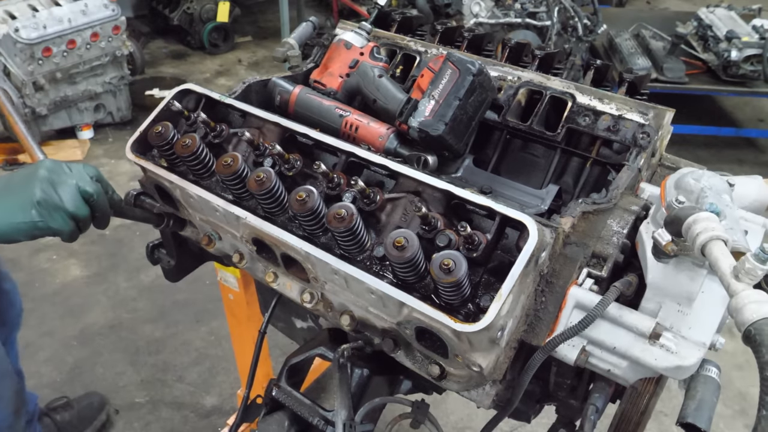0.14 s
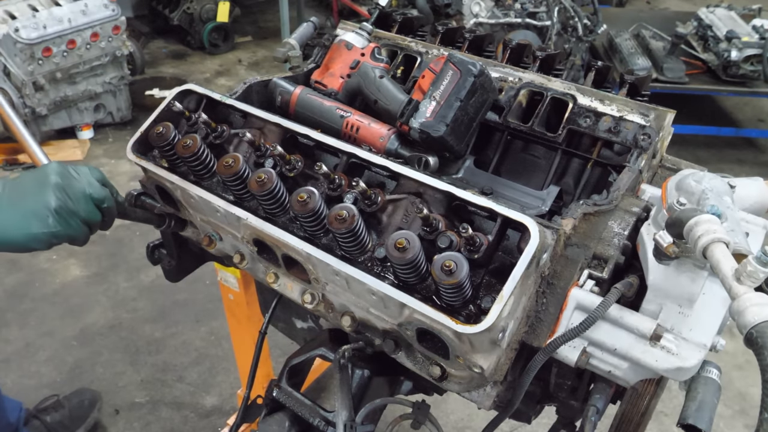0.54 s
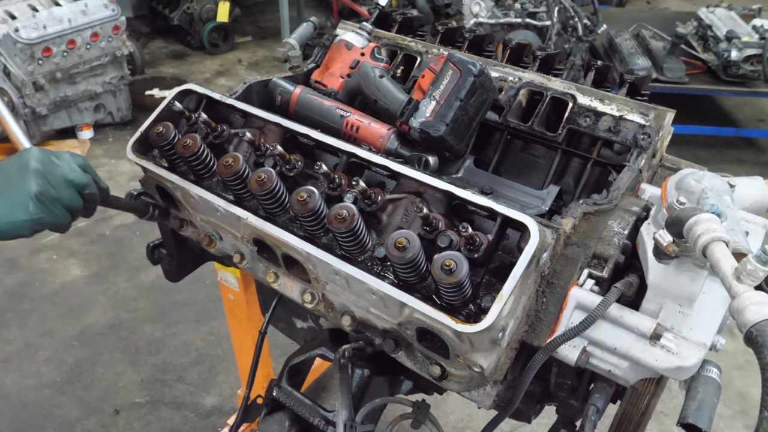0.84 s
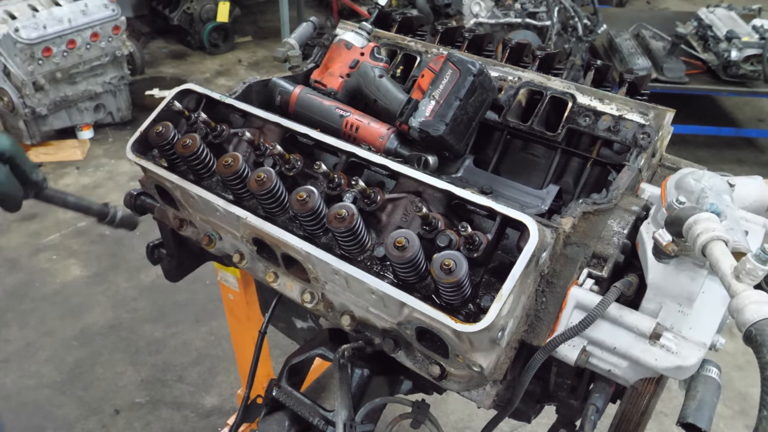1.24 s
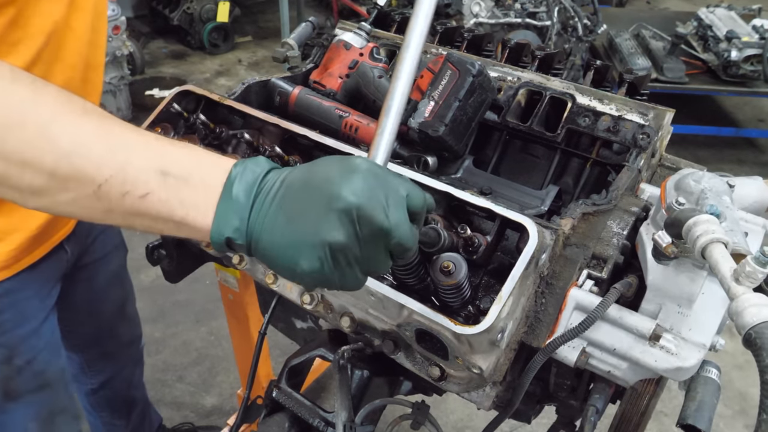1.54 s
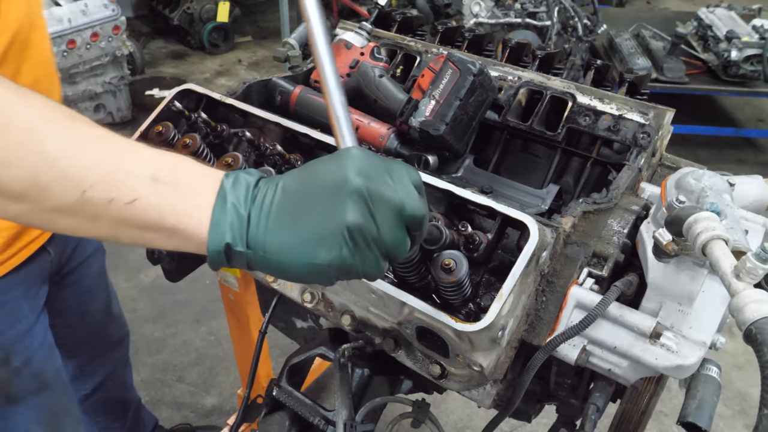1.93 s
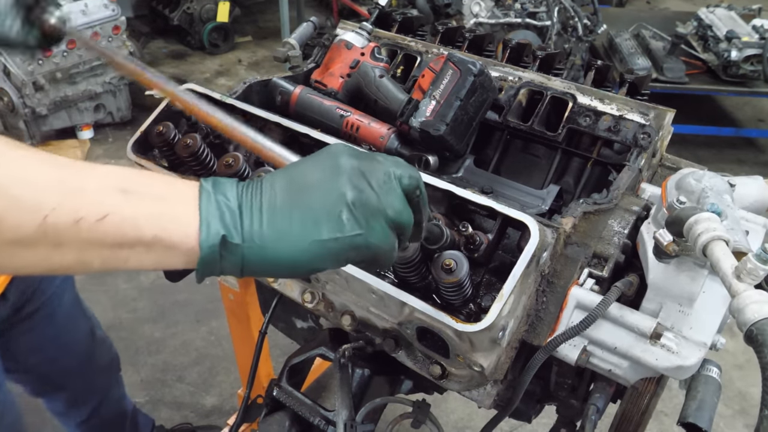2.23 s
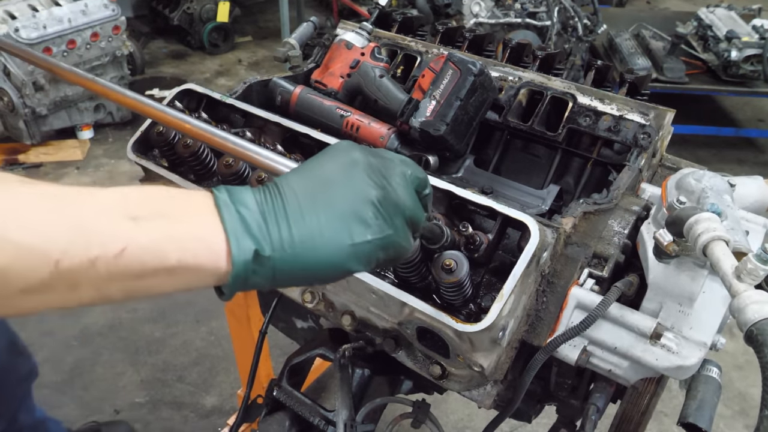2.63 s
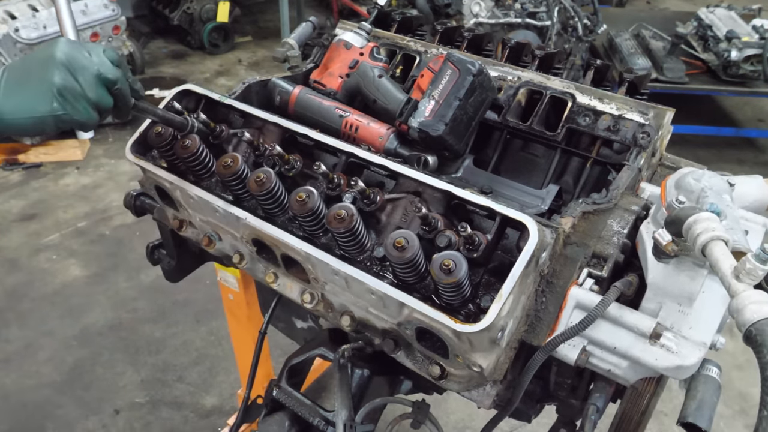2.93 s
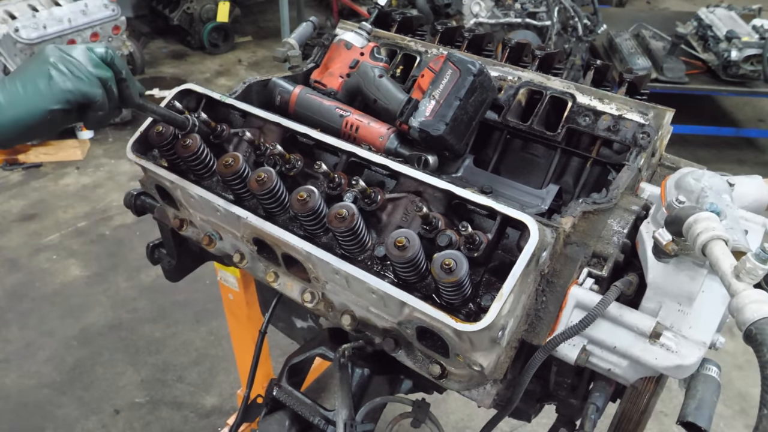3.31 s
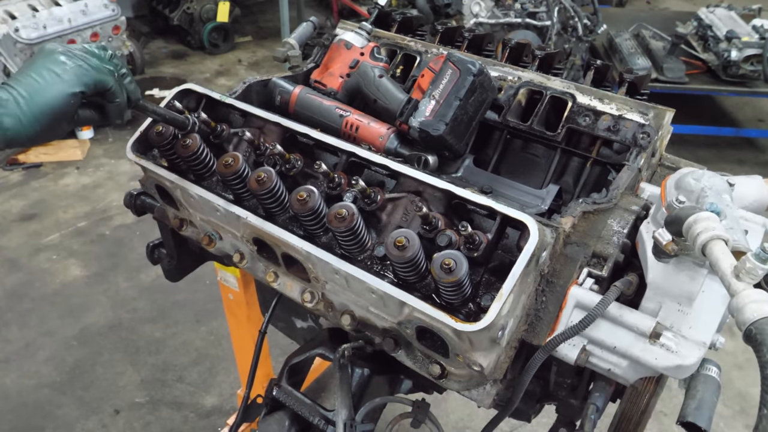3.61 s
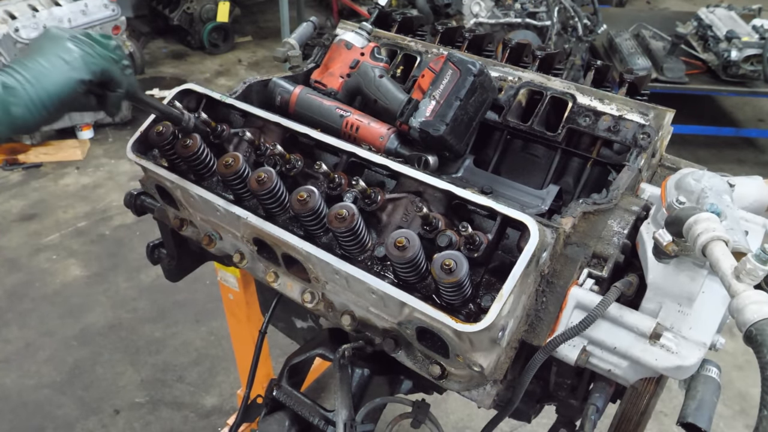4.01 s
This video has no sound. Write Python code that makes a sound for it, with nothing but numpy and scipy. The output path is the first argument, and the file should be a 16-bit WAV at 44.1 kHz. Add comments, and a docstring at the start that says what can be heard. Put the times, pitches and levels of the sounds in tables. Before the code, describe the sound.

A long steel breaker bar cracks two engine bolts loose with sharp double metallic snaps that ring briefly through a workshop, then a light socket click.

```python
"""In a workshop, a long steel breaker bar cracks two engine bolts loose, each with a double slip.
The bar rings as decaying sine modes under a snap of shaped noise; the engine stand thumps as a low
sine that glides down, and the hall rings on as filtered noise echoes. Between them the socket clicks
in modes of its own, small parts tick as noise bursts through a resonance, and gloves rustle and
scuff as coloured noise, over a low room rumble, mains hum and a faint stereo hiss."""
import sys
import numpy as np
from scipy import signal
from scipy.fft import rfft, irfft
from scipy.io import wavfile
from scipy.ndimage import uniform_filter1d

SR = 44100
rng = np.random.default_rng(int(sys.argv[2]) if len(sys.argv) > 2 else 0)


def digitize_waveform(pressure):
    """Quantize a signal to 16-bit integers and store it at the path in sys.argv[1].

    Rows of a 2-D input are taken as channels; values are limited to [-1, 1].
    """
    field = np.atleast_2d(pressure).T
    bounded = np.clip(field, -1, 1)
    quanta = np.round(bounded * 32767).astype(np.int16)
    wavfile.write(sys.argv[1], SR, quanta)


N = 183487


def amp(db):
    """Decibels to gain."""
    return 10 ** (np.asarray(db) / 20)


def evened(x):
    """Scales to rms 1."""
    return x / np.sqrt(np.mean(x ** 2) + 1e-20)


def read(points, hz):
    """Reads a spectrum table on a log frequency axis."""
    f, value = np.transpose(points)
    return np.interp(np.log(hz + 1), np.log(f + 1), value)


def curve(rows):
    """Draws a table of breakpoints as a straight-line curve at every sample."""
    return np.interp(np.arange(N) / SR, *np.transpose(rows))


def coloured(x, points):
    """Filters by a table of level over frequency, without shifting phase."""
    gain = amp(read(points, np.fft.rfftfreq(len(x), 1 / SR)))
    return irfft(rfft(x) * gain, len(x))


def add(mix, s, direct, sent, hall_db):
    """Adds a sound to the direct row and what it sends to the hall row."""
    part = mix[:, round(s * SR):][:, :len(direct)]
    part += np.array([direct, sent * amp(hall_db)])[:, :part.shape[1]]


def slip(grip, ring_db):
    """A bolt lets go: snap, thump and hall share follow the strength of the bar's ring."""
    # bending modes of the bar: [f/Hz]
    bar_hz = [721, 1215, 1864, 2585, 3172, 3335, 3540, 4118, 4265, 6620, 7850, 2536, 2880, 5700]
    # the same modes: [level at grip 0/dB, level at grip 1/dB, t60/s, rise/s, share sent to the hall/dB]
    bar_modes = [(-4, -17.5, 0.14, 0.013, -13), (-16, -10.5, 0.06, 0.0024, 2),
                 (-10.5, -7.5, 0.06, 0.00096, 4), (6, 4.5, 0.045, 0.0021, -1),
                 (-20.5, -2.5, 0.025, 0.0027, 7.8), (-4.5, -6.5, 0.039, 0.00067, 6.5),
                 (-18, -17.5, 0.11, 0.00076, -6), (-3.5, -19.5, 0.067, 0.00076, -1),
                 (-12, -20.5, 0.041, 0.0012, 4.5), (-14.5, -18.5, 0.0099, .001, -5.5),
                 (-18.5, 5, .008, 0.00082, -6.5), (1, -2, 0.054, 0.0045, -3), (-22.5, -7, 0.031, .0012, -1),
                 (-27, -13.5, .03, .0012, 3.5)]
    snap_db = 0.5 + 1.598 * ring_db  # the snap grows faster than the ring
    snap_t60_s = 0.046 + .0022 * ring_db  # and lasts longer when the ring is stronger
    thump_db = -7 + 1.45 * ring_db
    hall_db = -14.5 + .45 * ring_db + 5.5 * grip
    tilt_db = -0.82  # per octave
    direct, sent = blow(bar_hz, bar_modes, grip, ring_db, snap_db, snap_t60_s, tilt_db, thump_db)
    return direct, sent, hall_db


def click(*levels):
    """The socket seats or lifts: the same kind of blow on the modes of socket and extension."""
    # modes of socket and extension: [f/Hz]
    socket_hz = [601, 680, 2700, 3650, 4235, 4275, 4600, 7200]
    # the same modes: [level at grip 0/dB, level at grip 1/dB, t60/s, rise/s, share sent to the hall/dB]
    socket_modes = [(-29, -1.5, 0.49, .04, -9.5), (-17, -20, 0.22, 0.005, -1), (-26, 3, 0.018, .001, 1.5),
                    (-26.5, -1.5, 0.052, .004, -1.1), (-35, -14, 0.329, 0.0045, -0.5),
                    (-18, 6.5, 0.057, 0.00063, 1), (3, -5, 0.025, 0.001, 3.6),
                    (-38, 14, 0.021, 0.0014, -11)]
    return blow(socket_hz, socket_modes, *levels)


def blow(modes_hz, modes, grip, ring_db, snap_db, snap_t60, tilt_db, thump_db):
    """Modes swell and die, with a gritty snap and a low push; gives direct sound and hall send."""
    t = np.arange(SR // 2) / SR
    tilt = [(250, -3 * tilt_db), (16000, 3 * tilt_db)]  # six octaves about 2 kHz
    rings = ring(t, modes_hz, modes, grip, ring_db)
    direct = rings.sum(axis=0) + amp(snap_db) * snap(t, snap_t60, tilt) + amp(thump_db) * thump(t)
    sent_db = np.transpose(modes)[4][:, None]
    sent = (rings * amp(sent_db)).sum(axis=0) + wash_pulse(len(t), snap_db, tilt)
    return direct, sent


def ring(t, modes_hz, modes, grip, ring_db):
    """Each mode is a sine that swells, then dies; the grip sets the balance of the modes."""
    hz = np.array(modes_hz)[:, None]
    near_db, far_db, t60, rise, _ = np.transpose(modes)[:, :, None]
    # where the hand holds decides which modes sound
    db = near_db + np.clip(grip, 0, 1) * (far_db - near_db)
    swell = amp(db - 60 * t / t60) * (1 - np.exp(-t / rise)) ** 2
    start_cycles = 0.29 * rng.random(hz.shape)
    return amp(ring_db) * swell * np.sin(2 * np.pi * (hz * t + start_cycles))


def snap(t, t60, tilt):
    """Gritty noise with a near-instant attack, a main decay and a softer fixed one."""
    # colour of the snap before the tilt: [f/Hz, level/dB]
    snap_colour = [(150, -40.5), (300, -9), (1000, -15), (2200, -19.5), (3500, -13), (8000, -14),
                   (12000, -18), (16000, -32)]
    grit = evened(coloured(coloured(rng.standard_normal(len(t)), snap_colour), tilt))
    attack = 1 - np.exp(-t / 0.00016)
    return grit * attack * (amp(-60 * t / t60) + amp(-15.0 - 60 * t / 0.089))


def thump(t):
    """Push through the stand: a sine that glides down to 21 Hz as it dies."""
    late = np.maximum(t - .002, 0)  # follows the snap by 2 ms
    glide_cycles = 0.88 * (1 - np.exp(-late / 0.0068))
    return np.sin(2 * np.pi * (21 * late + glide_cycles)) * amp(-60 * late / .085)


def wash_pulse(length, snap_db, tilt):
    """The snap as it excites the hall: over all directions it is smooth, so one coloured pulse."""
    # bright snap as the walls return it: [f/Hz, level per Hz/dB]
    wash = [(1650, -37), (2800, -12), (3410, -3), (5020, -13), (5640, -10), (6110, -11), (7330, -7.5),
            (8550, -11.5), (9460, -11), (11700, -17), (12200, -23.5), (16000, -35.5)]
    # its lower end, in place of the first row above: [f/Hz, level per Hz/dB]
    wash_low = [(100, -48.5), (250, -27.5), (1000, -16), (2200, -15)]
    pulse = coloured(signal.unit_impulse(length, 300), wash_low + wash[1:])
    return coloured(pulse / np.linalg.norm(pulse), tilt) * amp(snap_db + 24.5)


def tick(db, hz, width_hz, t60):
    """Small part or tool: a burst of noise through one broad resonance."""
    t = np.arange(SR // 5) / SR
    f = np.fft.rfftfreq(len(t), 1 / SR)
    resonance = 1 / (1 + (2 * (f - hz) / width_hz) ** 2)
    band = irfft(rfft(rng.standard_normal(len(t))) * resonance, len(t))
    swell = 1 - np.exp(-t * width_hz / .6)  # a narrow resonance takes longer to swell
    return evened(band) * amp(db - 60 * t / t60) * swell


def hall(x):
    """Dense echoes: near benches fade fast, then each band dies at its own speed."""
    # slow decay of the hall: [f/Hz, t60/s]
    band_t60 = [(100, 1), (260, 3.6), (700, 0.94), (1840, 1.248), (4850, 1.008), (12800, 0.59)]
    hz, t, z = signal.stft(rng.standard_normal(2 * SR), SR, nperseg=256)
    walls = amp(-60 * t / read(band_t60, hz)[:, None])
    benches = amp(1.0 - 60 * t / 0.23)
    tail = signal.istft(z * (walls + benches), SR, nperseg=256)[1]
    # silent for 8 ms, then the echoes fade in
    tail = tail * np.clip((np.arange(len(tail)) / SR - .008) / 0.0071, 0, 1)
    return signal.fftconvolve(x, tail / np.linalg.norm(tail))[:N]


def strokes(rows, fall_s, rest_db):
    """Gain that rises, holds and falls for every stroke, over a steady rest."""
    t = np.arange(N) / SR
    gain = amp(rest_db)
    for s, rise, hold, db in rows:
        corners = np.cumsum([0, rise, hold, fall_s])
        gain = gain + amp(db) * np.interp(t - s, corners, [0, 1, 1, 0])
    return gain


def glove_rustle():
    """Gloves and sleeves: bright noise that swells with each gesture."""
    # colour of the cloth: [f/Hz, level/dB]
    rustle_colour = [(1500, -25), (4000, -5.5), (8000, 2.5), (12000, 1.5), (14500, -1), (15800, -27.5)]
    # gestures: [start t/s, rise/s, hold/s, level/dB]
    gestures = [(0, 0.0033, 0.098, -70.5), (.45, 0.041, 0.25, -81), (1.21, .03, 0.1, -74.5),
                (1.7, 0.41, .3, -63.5)]
    noise = evened(coloured(rng.standard_normal(N), rustle_colour))
    return noise * strokes(gestures, fall_s=0.023, rest_db=-75.5)


def hand_scuff():
    """Hands on metal: noise made grainy by stick and slip, with brief catches of the glove."""
    # colour of the scuff: [f/Hz, level/dB]
    scuff_colour = [(300, -30.5), (900, 0.5), (2000, -2), (4000, -11.5), (8000, -21.5)]
    # strokes: [start t/s, rise/s, hold/s, level/dB]
    scuffs = [(0, 0.0047, .05, -77), (.9, 0.054, .2, -72), (1.35, 0.047, 0.11, -80),
              (1.55, .07, 0.033, -62.5), (2.82, 0.052, .08, -71.5)]
    catches_per_s, least_catch_db, catch_decay_s = 25, -1, .004
    clumps = amp(2.1 * evened(uniform_filter1d(rng.standard_normal(N), 200)))  # stick and slip
    catch_gain = amp(least_catch_db + 6.3 * np.minimum(rng.exponential(1, N), 3))
    catches = (rng.random(N) < catches_per_s / SR) * catch_gain
    clumps = clumps + signal.lfilter([1], [1, -np.exp(-1 / (catch_decay_s * SR))], catches)
    noise = evened(coloured(rng.standard_normal(N) * clumps, scuff_colour))
    return noise * strokes(scuffs, fall_s=0.11, rest_db=-77)


def mains_hum():
    """A narrow 120 Hz tone whose phase and level waver slowly at random."""
    # hum level over time: [t/s, level/dB]
    hum_level = [(0, -72), (.28, -54.5), (.55, -73), (.83, -57.5), (1.08, -62), (1.3, -58.5), (1.5, -65),
                 (2.4, -67), (4.16, -66)]
    smooth = uniform_filter1d(uniform_filter1d(rng.standard_normal((2, N)), 1500), 1500)
    phase_waver, level_waver = evened(smooth)
    hum = np.cos(2 * np.pi * 120 * np.arange(N) / SR + .7 * phase_waver) * (1 + .35 * level_waver)
    return evened(hum) * amp(curve(hum_level))


def room_air():
    """Room rumble: coloured noise, levelled by its band from 200 to 1500 Hz."""
    # colour of the room noise: [f/Hz, level per Hz/dB]
    air_colour = [(12, -49.5), (20, -11.5), (86, 0.5), (123, -7), (154, -6), (459, -20.5), (923, -20.5),
                  (1290, -32.5), (2530, -36), (3070, -37), (8890, -38.5), (14700, -48), (16000, -59)]
    # level of that band over time: [t/s, level/dB]
    air_level = [(0, -68), (1.4, -67.5), (1.63, -64.5), (2.3, -64), (2.5, -70), (3.5, -71), (4.16, -71)]
    air = coloured(rng.standard_normal(N), air_colour)
    middle = signal.sosfilt(signal.butter(4, [200, 1500], "band", fs=SR, output="sos"), air)
    return air / np.std(middle) * amp(curve(air_level))


def side_hiss():
    """Faint steady noise, of opposite sign in the two channels."""
    # colour of the hiss: [f/Hz, level per Hz/dB]
    hiss_colour = [(24, -32.5), (40, 4.5), (133, -4), (377, -5.5), (650, -6.5), (999, -8), (6860, -9.5),
                   (9000, -31), (11700, -63.5), (19800, -120)]
    return amp(-77.5) * evened(coloured(rng.standard_normal(N), hiss_colour))


def scene():
    """Direct sound reaches both channels alike; bright echoes and a faint hiss differ."""
    # bolt slips: [t/s, grip (0-1), bar ring level/dB]
    slips = [(1.647, 0.38, -11.5), (1.7084, 0.38, -6), (3.0573, 0.95, -11.5), (3.1164, 1, -5.5)]
    # socket seats or lifts: [t/s, grip (0-1), ring level/dB, snap level/dB, snap t60/s,
    # snap tilt/dB per octave, thump level/dB, share sent to the hall/dB]
    clicks = [(0.783, 0.05, -35.5, -32.5, 0.0058, -0.96, -48, -25),
              (4.0767, 0.95, -27, -18.5, 0.0071, 1.27, -28.5, -18)]
    # small knocks and ticks of tools: [t/s, level/dB, centre f/Hz, width/Hz, t60/s]
    ticks = [(0.36, -52.5, 1513, 3890, 0.014), (.418, -55, 1778, 1500, 0.018), (.93, -54, 726, 905, 0.06),
             (0.963, -48, 730, 199.9, .1), (0.964, -61, 3956, 1499, 0.054),
             (1.098, -48, 2490, 4874, 0.0095), (1.452, -50, 3000, 12000, .016),
             (1.505, -48.5, 3000, 12000, .014), (1.56, -60.5, 1901, 697, .08),
             (1.624, -58.5, 1984, 1500, .1), (2.125, -48.5, 1500, 4000, 0.14),
             (2.826, -45, 2400, 7140, 0.11), (3.459, -46.5, 796, 1154, 0.053)]
    # echoes, side against middle: [f/Hz, level/dB]
    hall_width = [(300, -20), (2000, -46.5), (4500, -34.5), (7500, -15.5), (15000, -4)]
    mix = np.zeros((2, N))  # direct row, hall row
    for s, grip, ring_db in slips:
        add(mix, s, *slip(grip, ring_db))
    for s, *levels, hall_db in clicks:
        add(mix, s, *click(*levels), hall_db)
    for s, *shape in ticks:
        knock = tick(*shape)
        add(mix, s, knock, knock, hall_db=-4)
    direct, sent = mix
    background = glove_rustle() + hand_scuff() + mains_hum() + room_air()
    mid = direct + hall(sent) + background
    side = coloured(hall(sent), hall_width) + side_hiss()  # its own set of echoes
    return np.array([mid + side, mid - side])


def record(dry):
    """Soft clipping rounds the loudest peaks, then a steep low-pass limits the band."""
    held = .95 * np.tanh(dry / .95)
    low_pass = signal.firwin(255, 15600, window=("kaiser", 9), fs=SR)  # edge in Hz
    return signal.oaconvolve(held, low_pass[None], "same")


dry = scene()
out = record(dry)
digitize_waveform(out)
```